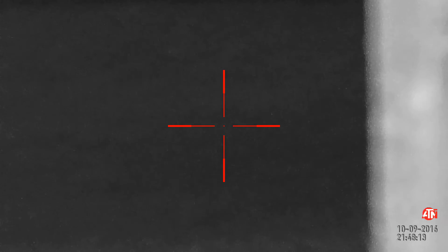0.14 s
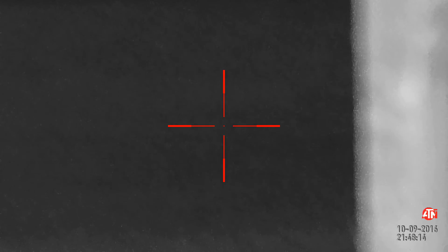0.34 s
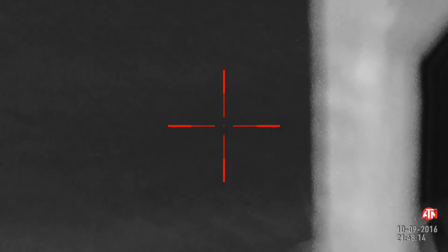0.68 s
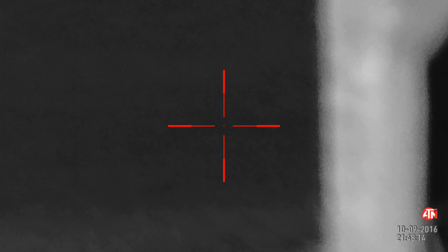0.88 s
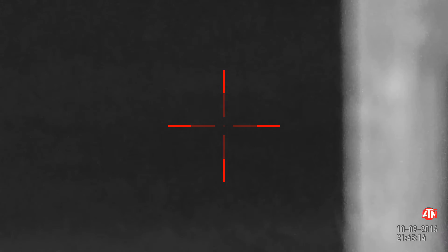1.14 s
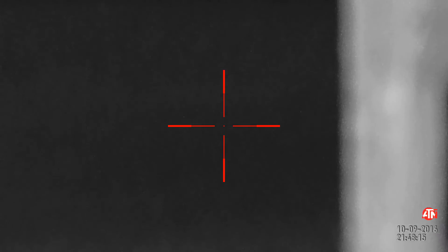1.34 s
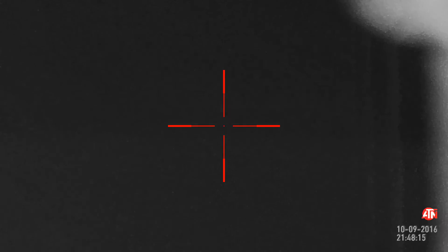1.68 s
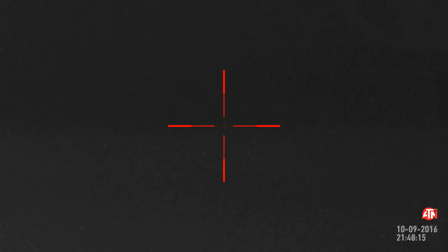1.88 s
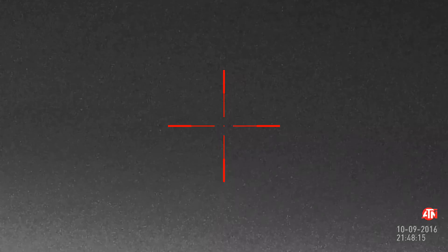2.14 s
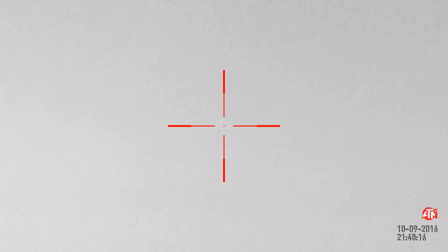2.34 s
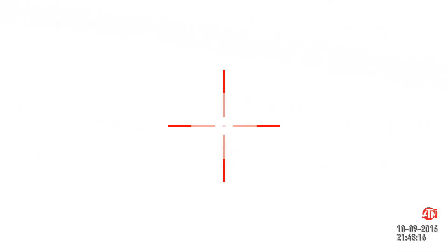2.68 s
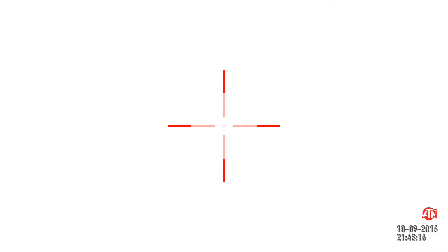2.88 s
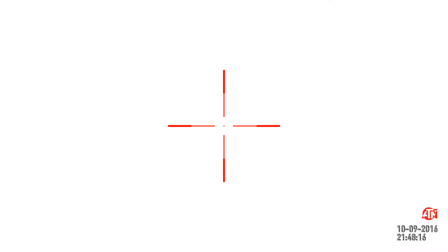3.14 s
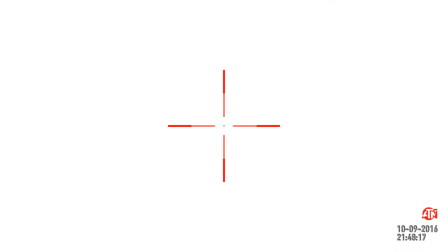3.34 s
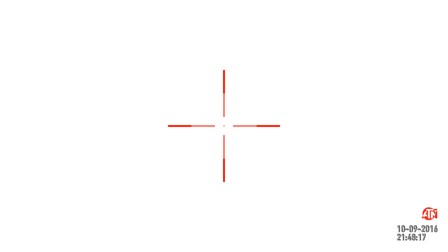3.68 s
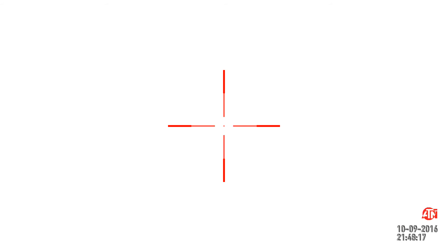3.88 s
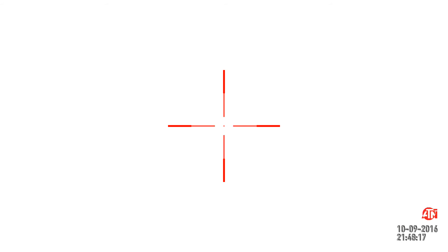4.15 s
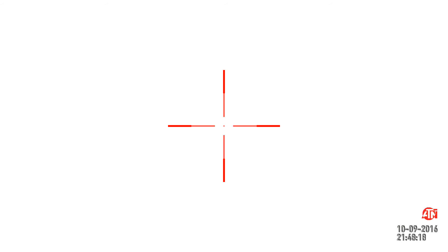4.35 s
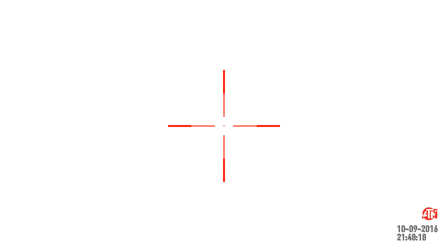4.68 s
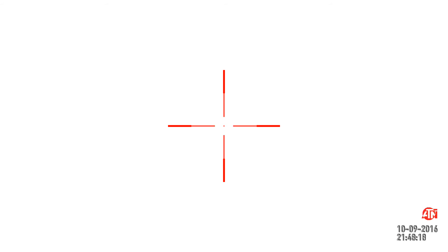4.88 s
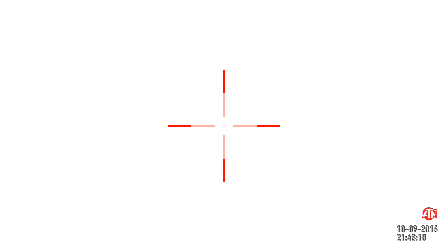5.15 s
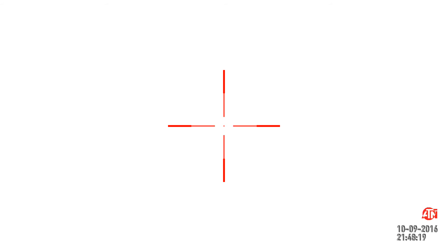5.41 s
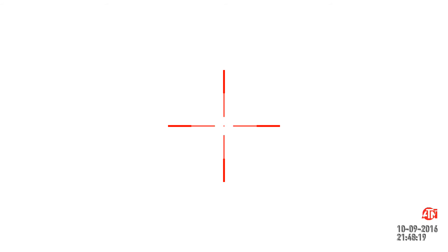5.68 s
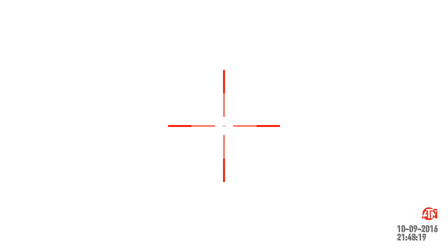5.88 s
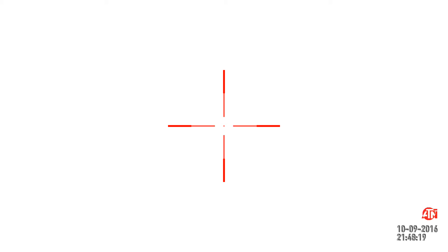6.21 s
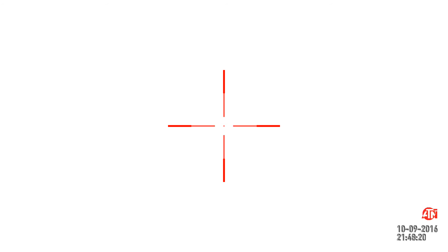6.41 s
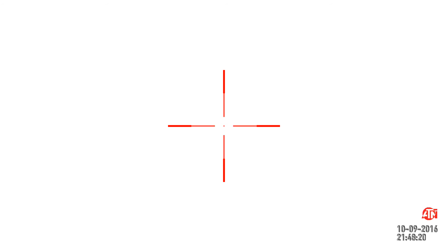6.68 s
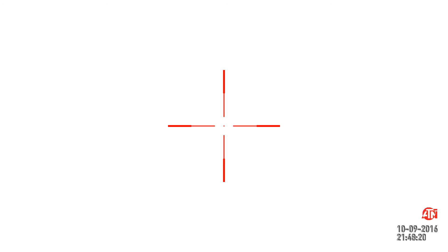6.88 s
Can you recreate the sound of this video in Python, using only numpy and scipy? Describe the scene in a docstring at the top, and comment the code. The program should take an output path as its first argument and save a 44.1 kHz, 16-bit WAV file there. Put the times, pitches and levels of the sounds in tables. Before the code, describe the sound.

Faint crickets trill and chirp throughout in the night air, over a soft microphone hiss, low rumble and a thin electrical whine. Distant leaves stir once, barely audible, around 1 second. From about 1.8 seconds, very close, a hand in cloth begins rubbing a hard device, with a few light clicks and a sharper one at 2.3. At 2.6 seconds its catch snaps loudly and rattles briefly. Soft scratchy rubbing and small taps continue until a second loud, bright snap at 3.7. The cloth brushes the casing again from 4 to 5 seconds, with a ringing click at 4.5. Around 5 seconds comes a quick cluster of clicks and a tiny, high steel ping. After that the handling eases into light rubs and scattered faint ticks, with the crickets carrying on until the end at about 7 seconds.

```python
"""Working a catch among crickets

Close by, a hand in cloth rubs along a hard device, fibres catching and slipping, and works a catch
that clicks, rattles and once snaps loudly. Each contact rings the body; a small steel part pings.
Behind it, crickets trill and chirp with pulsing wing strokes, and leaves stir once in the night air.
A small microphone hears it all, over faint hiss, low rumble and thin circuit tones."""
import sys
import numpy as np
from scipy import signal
from scipy.fft import rfft, irfft, next_fast_len
from scipy.io import wavfile
from scipy.ndimage import uniform_filter1d, map_coordinates

SR = 44100
rng = np.random.default_rng(int(sys.argv[2]) if len(sys.argv) > 2 else 0)


def transcribe(signal):
    """Save signal, clipped to [-1, 1], as a 16-bit WAV file at the path in sys.argv[1]."""
    frames = np.atleast_2d(signal).T
    limited = np.clip(frames, -1, 1)
    pcm = np.round(limited * 32767).astype(np.int16)
    wavfile.write(sys.argv[1], SR, pcm)


N = 310464

# Hits of the catch and fingers, with bass and treble set against the mid band:
# start_s, mid_peak_db, bass_db, treble_db, pitch_hz, scrape_t60_s, ring_db
CONTACTS = [(1.758, -44, 3, -10, 2160, 0.015, 12), (1.8707, -37.5, 9, -9, 970, 0.0081, -10),
            (2.047, -64.5, 15.5, -15, 1010, 0.015, -10), (2.089, -44.5, 2.5, -22, 1250, 0.011, 15),
            (2.251, -41, 1.5, -13, 1850, 0.027, 10), (2.3109, -23.5, -18, -30, 2480, 0.0078, -6),
            (2.55, -40.5, -2.5, -11, 557, .015, -15), (2.5923, -48, 2, 3, 470, 0.013, -2),
            (2.6051, -20, -3, 5.5, 3200, 0.027, -14.5), (2.6063, -9.5, -15, -31, 3430, 0.0075, 7.5),
            (2.6125, -25, -3.5, -16, 2240, 0.032, 15), (2.6275, -29.5, -3, -7, 3480, 0.019, -7),
            (2.637, -39, -12, -12, 1990, 0.0041, 14), (2.645, -16, -29, -6, 3370, 0.026, -20),
            (2.6507, -36, 10.5, -24, 740, 0.0031, 32), (2.663, -44.5, 9.5, -25, 1870, 0.017, 8),
            (2.6672, -23, -35, -37, 1850, 0.04, -4), (2.6753, -42.5, 8.5, -25, 630, 0.041, -18),
            (2.6953, -25.5, -6.5, -19, 3150, 0.043, 6), (2.715, -33, 1, -28, 3330, 0.019, 12),
            (2.905, -50, 4.5, -10, 480, 0.018, -4), (3.008, -56, 6.5, -10, 345, 0.021, -9),
            (3.1, -49, 1.5, -5, 500, 0.019, -11), (3.452, -49.5, 6.5, 15, 3700, 0.025, 4),
            (3.531, -38.5, 1.5, -5, 1210, 0.019, 26), (3.539, -39, 0, -10, 1220, 0.018, -15),
            (3.6137, -35, 0, -9.5, 1130, 0.037, 2), (3.669, -11, -9.5, -3, 3720, .036, -3),
            (3.6722, -9.5, -20.5, 11, 3660, 0.0066, 5.5), (3.6759, -34.5, 3.5, 21, 3500, 0.01, -5),
            (3.7063, -44, -4, 0, 940, 0.013, 3), (4.026, -44.5, 3, -8, 590, 0.0074, -15),
            (4.311, -47.5, 4.5, -13, 690, 0.019, 1), (4.4673, -28.5, -10.5, -34, 3560, 0.01, 25),
            (4.9261, -26, -18.5, 1.5, 1970, 0.019, -8), (4.9406, -31, -16, -18, 1990, 0.012, 9),
            (4.9839, -41.5, -4, 9.5, 680, 0.02, -10), (4.996, -47, -12, 11, 3600, 0.011, -2),
            (5.084, -42, -10, -9, 3720, 0.013, -5), (5.12, -41, -19, -24, 3600, 0.0091, 16),
            (5.131, -42, -6, -22, 720, 0.0058, -18), (5.182, -37, -9, -6, 1650, 0.023, -15.5),
            (5.413, -48.5, -16, -10, 3620, 0.007, 16), (5.832, -39, -25, -22, 3600, .008, -6),
            (5.955, -50, -25, -9, 5390, .02, 3), (5.995, -48.5, -17, -19, 2100, .008, 2),
            (6.046, -46, 1.5, -7, 1296, 0.029, 8), (6.307, -47.5, -15, -22, 3600, 0.013, 10),
            (6.491, -43.5, -18.5, -16, 2210, 0.013, 16), (6.572, -45, -24, -16.5, 3790, .014, 4),
            (6.773, -46, -17, -7, 3600, 0.011, 15.5)]
# Modes of the hard body: pitch_hz, level_db, t60_s
BODY_MODES = [(240, -6, .04), (430, -7, .03), (735, 3, .04), (1200, -3, .022), (1900, -2, .025),
              (2150, 0, .03), (2330, -3, .025), (3420, 1, .025), (3600, 3, .04), (4800, -4, .014),
              (6500, -2, .012), (8400, 6, .011), (9550, 2, .01), (15000, 2, .007)]
# Strikes on the small steel part: start_s, level_db, t60_s
STEEL_STRIKES = [(4.962, -33, 0.022), (4.984, -38, 0.027), (4.996, -35.5, 0.11)]
# Partials of the steel part: pitch_hz, level_db, damped_after_s
STEEL_PARTIALS = [(6510, -3.5, .03), (10000, -25, .06)]
# Hand strokes, with fizz and drag set against the hiss: start_s, hold_s, hiss_db, fizz_db, drag_db
HAND_STROKES = [(.72, 0.037, -72, -2, 0), (2.19, .04, -64.5, -11, 3), (2.319, 0.0023, -59, -12, 4.5),
                (2.397, 0.0026, -50.5, -7, -1.5), (2.42, .13, -58.5, -6, -1),
                (2.497, 0.0027, -47, -9, -4.5), (2.916, .005, -58.5, -7, -5), (2.95, .24, -65.5, -5, -8),
                (3.255, 0.0025, -47.5, -4, -9.5), (3.28, 0.024, -55.5, -4, -8),
                (3.332, 0.0027, -48.5, -5, -12), (3.47, 0.027, -59, -4, -5.5), (3.542, 0.0016, -68, 1, 16),
                (4.021, .003, -61.5, -6, 1.5), (4.19, .03, -57, -2.5, -10), (4.339, 0.014, -63, -1, 4),
                (4.462, 0.013, -71, -12, 13), (4.61, .25, -54.5, -11, -4.5),
                (4.647, 0.0049, -52.5, -13, -10), (4.76, 0.059, -57.5, -10, -8), (5.0, 0.054, -64, -11, -6),
                (5.206, .003, -59.5, -2, -9), (5.44, 0.052, -62, -4, -19), (5.54, 0.19, -61.5, -7, -18),
                (5.819, .003, -59.5, -11, -4), (5.94, .02, -66, -15, -7), (6.05, 0.042, -65.5, -11, 4.5),
                (6.59, .04, -68.5, -11, 4.5), (6.7, .1, -71.5, -13, -9)]
# Cloth creeping between strokes: time_s, hiss_db
CLOTH_CREEP = [(0, -78), (1.3, -79.5), (1.7, -72.5), (2.13, -68.5), (2.6, -65), (2.86, -71), (3.35, -65),
               (3.6, -67.5), (4.15, -63.5), (4.4, -66.5), (5.1, -67.5), (5.4, -71.5), (6.15, -71.5),
               (6.35, -77), (7.04, -71)]
# Colour of the cloth's hiss: frequency_hz, level_db
CLOTH_SPECTRUM = [(2500, -51), (3500, -12.5), (5100, -6), (7600, -3.5), (9300, -3), (10500, -7.5),
                  (11500, -13.5), (13000, -51.5)]
# Colour of the finest fibres' fizz: frequency_hz, level_db
FIZZ_SPECTRUM = [(9000, -34.5), (10800, -6), (12000, -4), (14500, -4.5), (15800, -11)]
# Colour of the drag on the body: frequency_hz, level_db
DRAG_SPECTRUM = [(200, -21), (500, -8.5), (1000, -4.5), (1350, 1), (1650, -2), (2050, 2.5), (2700, -4.5),
                 (3500, -4), (5000, -17.5), (6500, -13.5)]
# Drift of the cricket chorus: time_s, level_db, pitch_hz
CHORUS_DRIFT = [(0, -63.5, 4110), (.49, -66, 4124), (2.61, -62.5, 4247), (3.0, -68, 4234),
                (3.41, -63.5, 3980), (3.71, -71.5, 3995), (3.9, -62, 4170), (4.25, -65.5, 4200),
                (4.59, -62, 4200), (5.0, -69.5, 4080), (5.55, -70, 4180), (6.04, -63, 4150),
                (6.25, -70.5, 4126), (7.04, -65.5, 4167)]
# Chirps of the nearer crickets: start_s, pitch_hz, level_db
NEAR_CHIRPS = [(.01, 4530, -68.5), (0.269, 4125, -66), (0.875, 4410, -69), (1.07, 4190, -76),
               (1.425, 4210, -66.5), (1.69, 4500, -69), (1.874, 4210, -64.5), (2.12, 4430, -65.5),
               (2.791, 4200, -70), (3.157, 4420, -65.5), (3.36, 4060, -75), (3.78, 4230, -68),
               (3.942, 4520, -68.5), (4.373, 4450, -62.5), (4.52, 4060, -68), (5.251, 4070, -71),
               (5.655, 4460, -69.5), (5.84, 4340, -72), (6.07, 4060, -71.5), (6.272, 4500, -70.5),
               (6.599, 4060, -71), (6.881, 4250, -75)]
# Swell of the distant leaves: time_s, level_db
LEAF_SWELL = [(.5, -89), (.68, -71), (.95, -69.5), (1.1, -66), (1.25, -101)]
# Steady background noise bands: centre_hz, width_hz, level_db
NOISE_BANDS = [(2196, 150, -76), (704, 85, -84), (3620, 1400, -73.5)]
# Colour of the night air and microphone hiss: frequency_hz, level_db
AIR_SPECTRUM = [(4, -7.5), (20, -9.5), (100, -14.5), (420, -14.5), (1000, -15), (1500, -20), (2700, -24.5),
                (4100, -10.5), (5500, -24), (9000, -30.5), (14000, -26), (15750, -23.5)]
# Whine of the circuit: pitch_hz, rms_db
CIRCUIT_TONES = [(150, -86), (297, -85), (400, -87), (500, -84), (700, -85), (720, -85), (1000, -76),
                 (1440, -85), (2000, -87), (13980, -86)]
# Colour of the faint rumble and hiss in each channel: frequency_hz, level_db
FLOOR_SPECTRUM = [(4, 11.5), (20, -2.5), (100, -17), (1000, -33), (2500, -39.5), (4200, -51), (6000, -35),
                  (15750, -33)]


def catch_clicks():
    """Each contact is a blow and a short scrape, heard directly and ringing the modes near its pitch."""
    out, t = np.zeros(N + SR), np.arange(SR // 10) / SR
    for start_s, peak_db, bass_db, treble_db, pitch_hz, t60_s, ring_db in CONTACTS:
        hardness = min(amp(ring_db + 12.5), 1)  # a soft finger starts slowly and lands no sharp blow
        attack = 1 - np.exp(-t * hardness ** 2 / .0003)
        scrape = rng.standard_normal(len(t)) * amp(-60 * t / t60_s) * attack
        scrape[12] += 3.43 * hardness ** 2  # the blow itself
        struck = filtered(scrape, lambda hz: body_response(hz, pitch_hz, ring_db))
        top_hz = np.clip(11503.5 + 400 * treble_db, 7000, 16000)  # a duller contact reaches less high
        mids = band(struck, 1300, 5000)
        bass = amp(bass_db) * band(struck, 300, 1300)
        treble = amp(treble_db) * band(struck, 5200, top_hz)
        thump = amp(-36) * band(scrape, 70, 260)  # the whole device jolts a little
        out[round(start_s * SR):][:len(t)] += amp(peak_db) * (mids + bass + treble + thump)
    return out[:N]


def body_response(hz, pitch_hz, ring_db):
    """The hard body colours a hit: a broad knock, plus modes that ring less the further off its pitch."""
    hollow = 1 - .75 * resonance(hz, 2800, 900)  # little radiates between the two main modes
    knock = (.15 + 2.6 * resonance(hz, pitch_hz, 1.34 * pitch_hz)) * hollow
    ring = 0
    for mode_hz, level_db, t60_s in BODY_MODES:
        octaves_off = min(abs(np.log2(mode_hz / pitch_hz)), .9)
        gain = amp(level_db - 14 * octaves_off + rng.normal(0, 2.2))
        ring += gain * resonance(hz, mode_hz, width_hz=np.log(1000) / np.pi / t60_s)
    return knock + amp(ring_db + 10) * ring


def steel_pings():
    """The steel part sings until something damps it."""
    out, t = np.zeros(N), np.arange(SR // 10) / SR
    for start_s, strike_db, t60_s in STEEL_STRIKES:
        tone = sum(amp(db) * np.clip((damped_s - t) / .005, 0, 1) * np.sin(2 * np.pi * hz * t)
                   for hz, db, damped_s in STEEL_PARTIALS)
        out[round(start_s * SR):][:len(t)] += amp(strike_db - 60 * t / t60_s) * tone
    return out


def cloth_rubbing():
    """Fibres catch and slip in grains of a few ms; strokes swell and fade over the resting hand's creep."""
    rise_db_per_s, fall_db_per_s = 399, 439
    t, creep = np.arange(N) / SR, amp(curves(CLOTH_CREEP)[0])
    power = np.square([creep, amp(-6) * creep + amp(-80.5), amp(-2.5) * creep])  # hiss, fizz, drag
    for start_s, hold_s, hiss_db, fizz_db, drag_db in HAND_STROKES:
        span = slice(max(round(start_s * SR) - SR // 8, 0), round((start_s + hold_s) * SR) + SR // 8)
        age_s = t[span] - start_s
        fade_db = np.maximum(-rise_db_per_s * age_s, fall_db_per_s * (age_s - hold_s)).clip(min=0)
        power[:, span] += np.outer(amp([0, fizz_db, drag_db]), amp(hiss_db - fade_db)) ** 2
    slips_db = .7 * wobble(40) + 1.5 * wobble(500)  # one grain shared by all three layers
    hiss = unit(amp(slips_db) * noise(CLOTH_SPECTRUM))
    fizz = unit(amp(slips_db) * noise(FIZZ_SPECTRUM))
    drag = unit(noise(DRAG_SPECTRUM) * amp(slips_db + 1.2 * wobble(25)))
    return np.sum(np.sqrt(power) * [hiss, fizz, drag], axis=0)


def cricket_chirps():
    """A near cricket chirps in a burst of 54 wing strokes a second, each a short tone."""
    out = np.zeros(N)
    for start_s, pitch_hz, level_db in NEAR_CHIRPS:
        length_s = .155 if pitch_hz > 4330 else .175  # higher singers are briefer
        start = round(start_s * SR)
        t = np.arange(min(round(length_s * SR), N - start)) / SR
        gate = np.clip(np.minimum(t, length_s - t) / .0048, 0, 1)
        wings = np.sin(np.pi * 54 * t) ** 2 * gate
        gain = 2.8 * amp(level_db + 1.2 * wobble(60)[:len(t)])  # strokes vary in strength
        out[start:][:len(t)] += gain * wings * np.sin(2 * np.pi * pitch_hz * t)
    return out


def cricket_chorus():
    """Six singers come and go, each at its own pitch and wing rate, blurring into one trill."""
    level_db, centre_hz = curves(CHORUS_DRIFT)
    chorus = 0
    for detune_hz, wing_hz in [(-190, 44), (-110, 46), (-41.5, 65), (11, 49), (69.5, 40), (140, 25)]:
        wings = (.5 + .5 * gliding_sine(wing_hz + 2.52 * wobble(6))) ** 1.1
        tone = gliding_sine(centre_hz + detune_hz + 18 * wobble(40))
        swell = amp(2.56 * wobble(4.5) - abs(detune_hz) / 30)
        chorus += swell * wings * tone
    return amp(level_db) * unit(chorus)


def leaves():
    """Dry leaves stir once, dull with distance."""
    return amp(curves(LEAF_SWELL)[0] + 3.9 * wobble(20.2)) * tuned_noise(3680, width_hz=2200)


def noise_bands():
    """Steady background bands: a low electrical hum, a thin whine and a broad hiss."""
    return sum(amp(db) * tuned_noise(hz, width_hz) for hz, width_hz, db in NOISE_BANDS)


def night_air():
    """A gently wavering bed of air and microphone hiss."""
    return amp(-66.5 + .98 * wobble(4.354)) * noise(AIR_SPECTRUM)


def circuit_whine():
    """Thin tones flicker in the circuit; the one at 1 kHz drops out briefly once a second."""
    first_gap_s, gap_s = .57, .06
    t = np.arange(N) / SR
    gate = uniform_filter1d(1. * ((t - first_gap_s) % 1 > gap_s), size=300)
    out = 0
    for hz, rms_db in CIRCUIT_TONES:
        tone = np.sqrt(2) * amp(rms_db + 1.3 * wobble(16)) * np.sin(2 * np.pi * hz * t)
        out += tone * gate if hz == 1000 else tone
    return out


def stereo_floor():
    """Faint low rumble and hiss, separate in each channel, lumpy in the bass."""
    floor = np.array([noise(FLOOR_SPECTRUM), noise(FLOOR_SPECTRUM)])
    bass = filtered(floor, lambda hz: 1 / (1 + (hz / 120) ** 4))
    lumps = amp(2.3 * np.array([wobble(26), wobble(21)]) + .3)
    return amp(-66.5) * (floor - bass + lumps * bass)


def amp(db):
    """dB to gain."""
    return 10 ** (np.asarray(db) / 20)


def unit(x):
    """Scaled to rms 1."""
    return x / np.sqrt(np.mean(x ** 2) + 1e-20)


def curves(rows):
    """An automation curve for each column after the time."""
    times_s, *columns = np.transpose(rows)
    return [np.interp(np.arange(N) / SR, times_s, column) for column in columns]


def wobble(rate):
    """A smooth random curve, rate knots a second."""
    return map_coordinates(rng.standard_normal(int(N * rate / SR) + 4), [np.arange(N) * rate / SR])


def gliding_sine(hz):
    """A sine that follows a frequency curve."""
    return np.sin(2 * np.pi * np.cumsum(hz) / SR)


def filtered(x, response):
    """x shaped by a complex frequency response."""
    size = next_fast_len(x.shape[-1] + 8192)
    return irfft(rfft(x, size) * response(np.fft.rfftfreq(size, 1 / SR)), size)[..., :x.shape[-1]]


def resonance(hz, centre_hz, width_hz):
    """Causal response of one resonance, peak 1."""
    return 1j * hz * width_hz / (centre_hz ** 2 - hz ** 2 + 1j * hz * width_hz)


def band(x, low_hz, high_hz):
    """A causal band of x, peak 1."""
    part = signal.sosfilt(signal.butter(2, [low_hz, high_hz], "bandpass", fs=SR, output="sos"), x)
    return part / np.abs(part).max()


def noise(spectrum):
    """Noise of rms 1, coloured by EQ points joined on a log frequency axis."""
    points_hz, points_db = np.transpose(spectrum)
    eq = lambda hz: amp(np.interp(np.log1p(hz), np.log1p(points_hz), points_db, left=-120, right=-120))
    return unit(filtered(rng.standard_normal(N), eq))


def tuned_noise(centre_hz, width_hz):
    """Noise of rms 1, passed twice through one resonance."""
    return unit(filtered(rng.standard_normal(N), lambda hz: resonance(hz, centre_hz, width_hz) ** 2))


def scene():
    """Everything sits in the centre except the faint stereo rumble and hiss."""
    handling = catch_clicks() + steel_pings() + cloth_rubbing()
    background = leaves() + cricket_chorus() + cricket_chirps() + noise_bands()
    return handling + background + circuit_whine() + night_air() + stereo_floor()


def record(dry):
    """The microphone's top end falls in two steps from 15.6 kHz, then cuts off."""
    def response(hz):
        loss_db = 15 * np.clip((hz - 15600) / 300, 0, 1) + 33 * np.clip((hz - 16450) / 520, 0, 1)
        return amp(-loss_db) * (hz < 16950)
    return filtered(dry, response)


dry = scene()
out = record(dry)
transcribe(out)
```